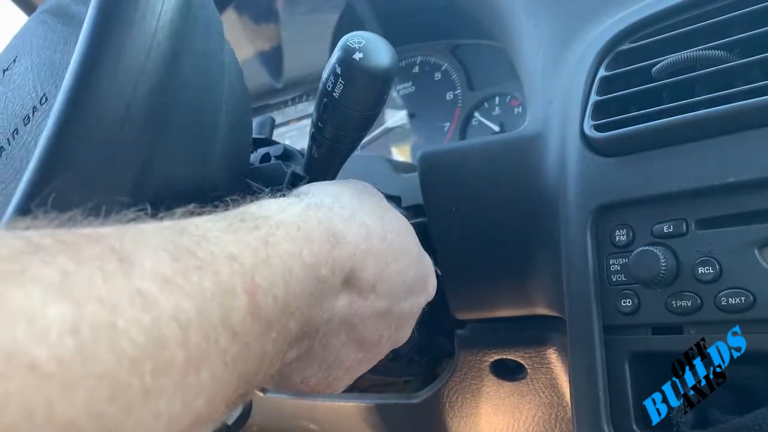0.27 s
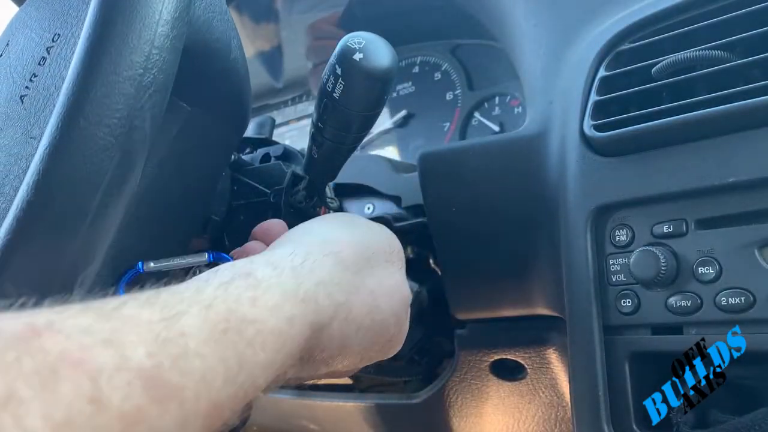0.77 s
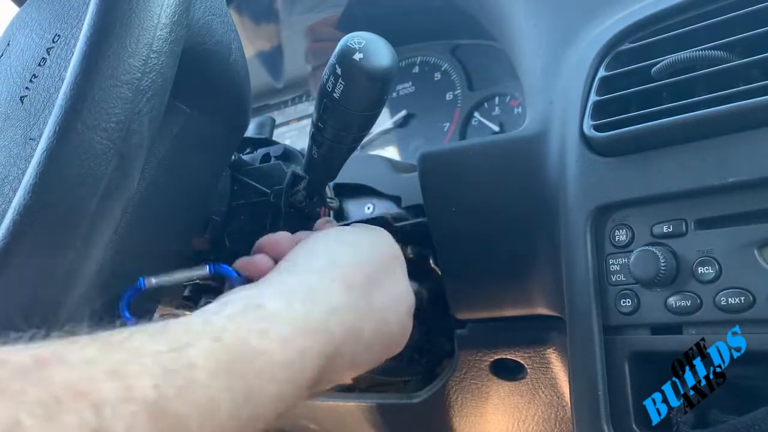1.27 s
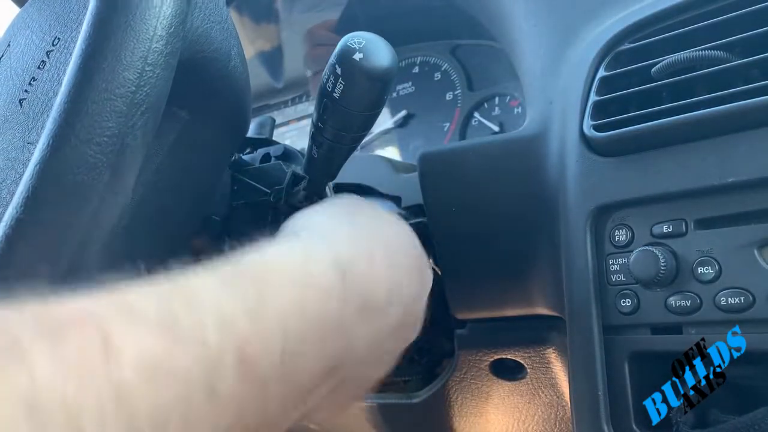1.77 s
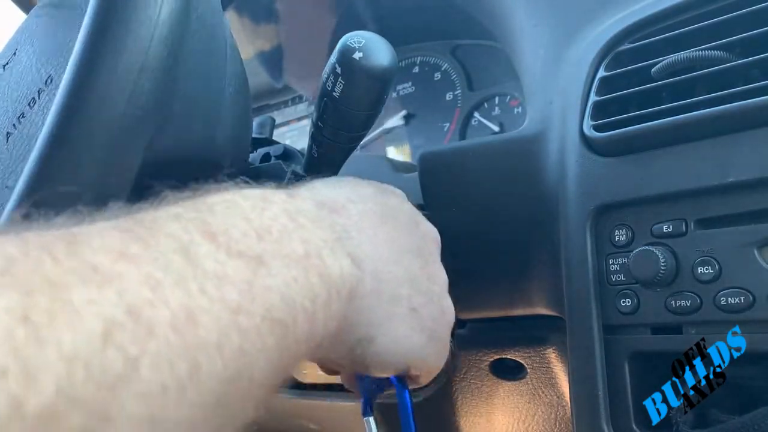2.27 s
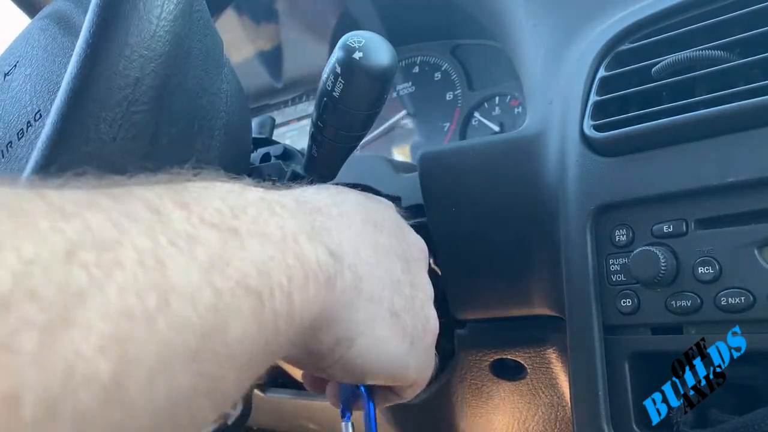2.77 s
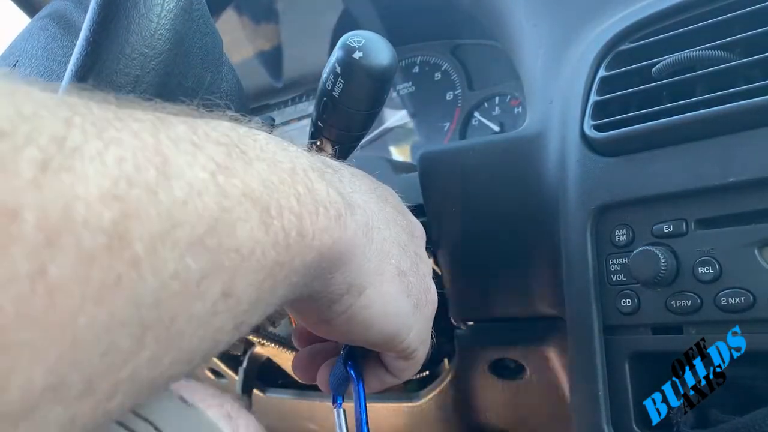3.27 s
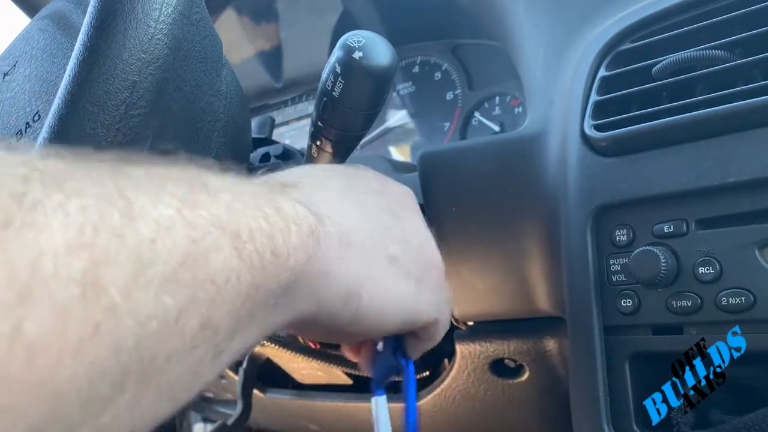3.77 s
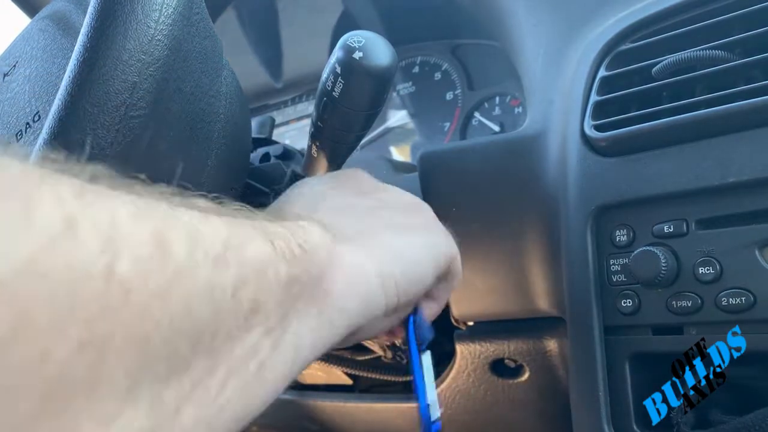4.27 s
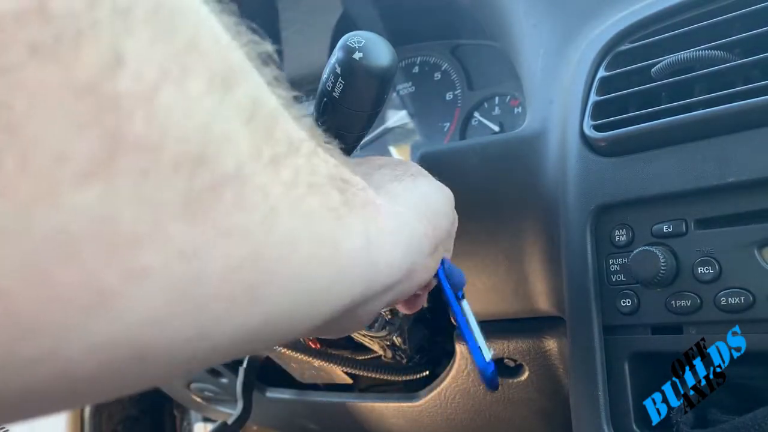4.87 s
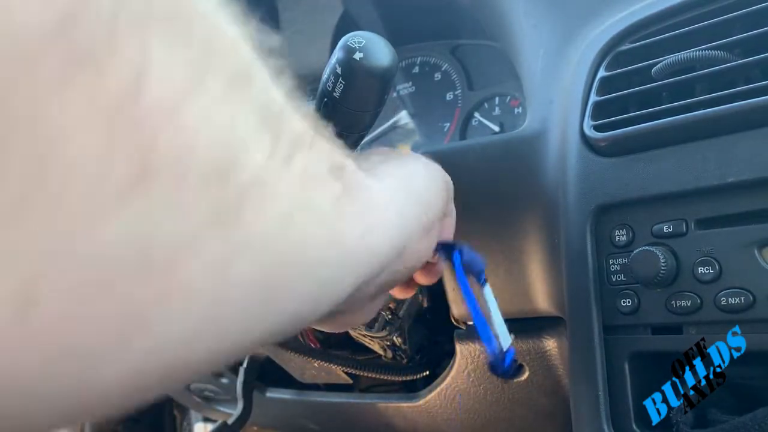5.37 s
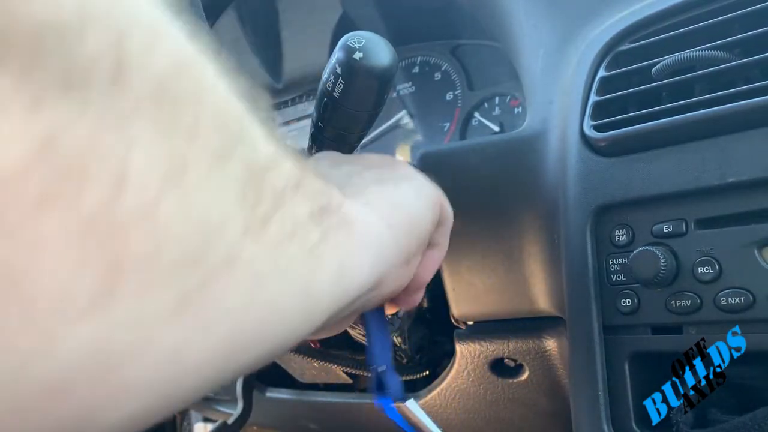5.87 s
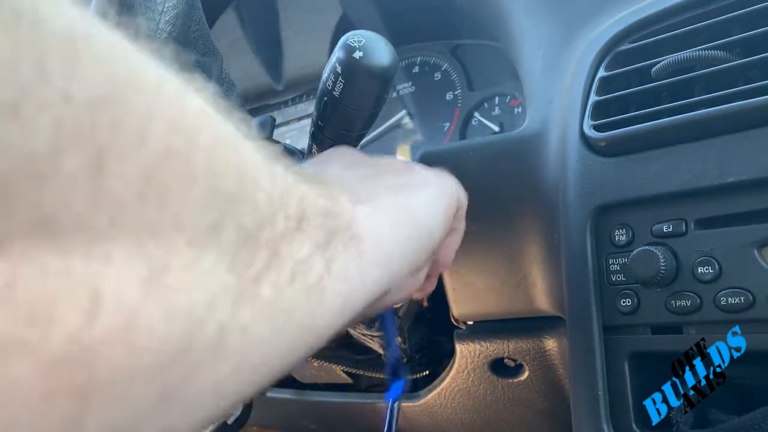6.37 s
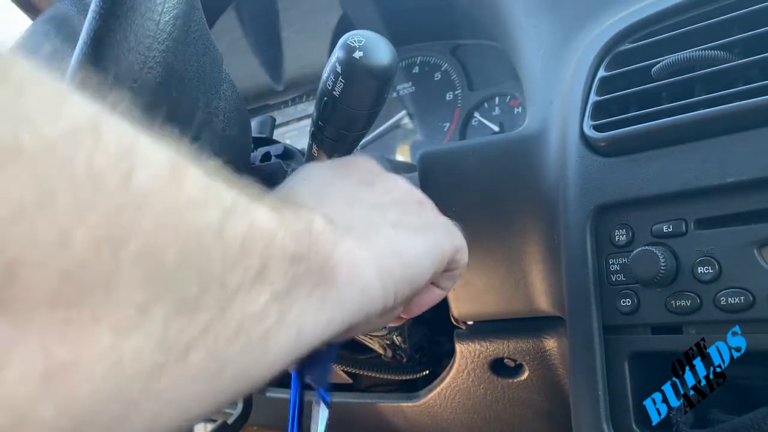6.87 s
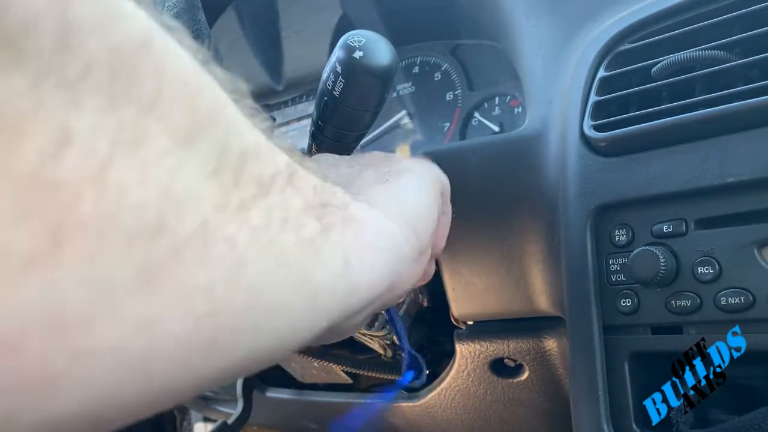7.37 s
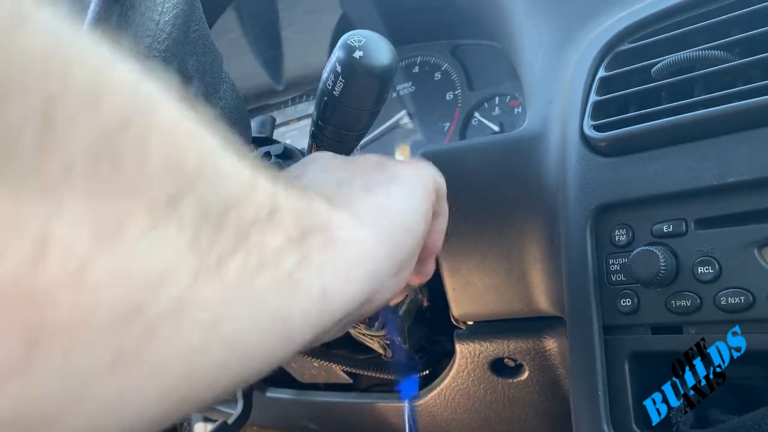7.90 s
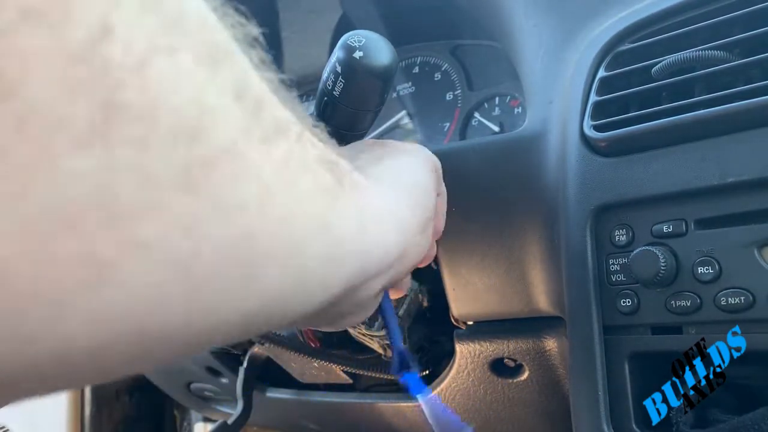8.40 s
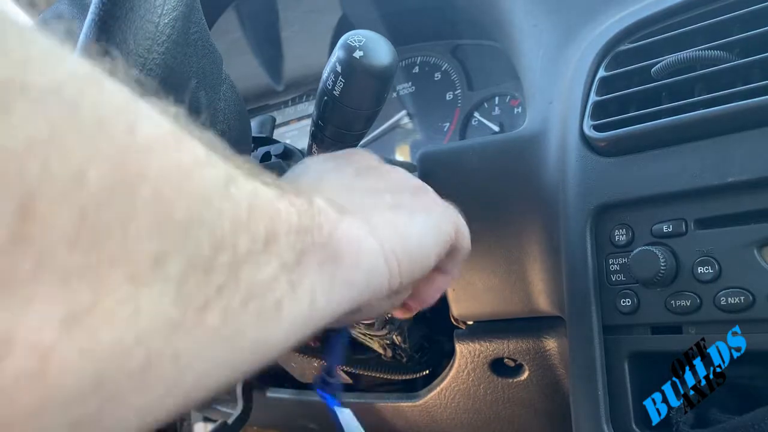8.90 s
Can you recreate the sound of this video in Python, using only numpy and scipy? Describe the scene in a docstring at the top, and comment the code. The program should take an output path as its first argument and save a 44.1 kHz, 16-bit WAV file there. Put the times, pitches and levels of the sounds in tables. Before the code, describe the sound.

Inside a parked car, very close in stereo, a key is worked in a worn ignition lock. Quiet low rumble and faint ticks come first, then a cluster of sharp clicks, a pause with cloth rubbing, a heavy hollow clunk on plastic trim and several deep thumps. A metal clip rings briefly as it bounces, then brisk clicks and small key jingles continue to the end, driest and brightest near the last second.

```python
"""A key is jiggled and turned in a worn ignition lock inside a parked car, heard close by in two channels.
Pins and key tick against the barrel, the housing clacks and the steering column knocks: bursts of shaped noise.
A snap hook rings as it is struck and bounces, the key ring pings and the trim clunks: sums of decaying sines.
Low thumps and higher housing raps are pairs of sines; cloth rustles in filtered noise as the driver shifts,
over the low rumble of the closed cabin, a noise whose boom swells and is stirred by the thumps."""
import sys
import numpy as np
from scipy import signal
from scipy.fft import rfft, irfft, next_fast_len
from scipy.io import wavfile
from scipy.ndimage import uniform_filter1d

SR = 44100
rng = np.random.default_rng(int(sys.argv[2]) if len(sys.argv) > 2 else 0)


def int16_out(signal):
    """Quantize to a 16-bit WAV file."""
    q = np.round(np.clip(np.atleast_2d(signal).T, -1, 1) * 32767)
    wavfile.write(sys.argv[1], SR, q.astype(np.int16))


N = 403074
SLIDE_START_S = 0.03  # lead-in of a burst before the key lands

# Key against the barrel. Each row: landing in seconds, tick level in dB,
# clack of the housing and knock of the column in dB over the tick.
KEY_CLICKS = [(0.6097, -54.5, 4.5, 3), (0.672, -58.5, 13.5, 7), (0.988, -57.5, 12.5, -14),
              (1.019, -36, -6.5, -3.5), (1.176, -61, 6.5, -8), (1.2345, -38.5, 1.5, -5.5),
              (1.387, -55.5, 6, -25), (1.4032, -40.5, 0, -19), (1.417, -39.5, -5.5, -3),
              (1.5908, -48.5, 2.5, -3), (1.6099, -36.5, -14, -8), (1.6214, -36.5, -2.5, -7.5),
              (1.792, -44, 3.5, 1), (1.8306, -35, -7, -13), (2.321, -49, -24, -10), (2.4531, -49, 0, 10),
              (2.4968, -52.5, 4.5, 7.5), (2.707, -51, -0.5, 4.5), (2.9718, -31.5, -3, -22),
              (3.0042, -45.5, -19, 9), (3.586, -57.5, 17, 21), (3.794, -56.5, 12.5, 26.5),
              (3.8626, -48.5, -5, 1.5), (4.0116, -55.5, 3, 8), (4.1307, -50, 11, -13),
              (4.1343, -41, 7.5, 7.5), (4.2105, -33, -13.5, -10), (4.439, -43, 4, -5.5),
              (4.6159, -38, -2, 0.5), (4.6323, -27.5, -4, -12.5), (4.8421, -39.5, -6.5, -11),
              (5.113, -50, 9, 15), (5.1627, -49.5, -26, -1), (5.422, -33.5, -8, -12),
              (5.6121, -46.5, -11, -3), (5.6337, -30.5, -3.5, -6), (5.8386, -40.5, 0.5, -2.5),
              (5.8686, -46, -7, -7), (5.9266, -39.5, -3.5, -5.5), (6.0444, -36, -5, -14),
              (6.088, -35, -2, -30), (6.1199, -52, 6, 4), (6.222, -50.5, 1.5, 3), (6.294, -43.5, -8.5, -4),
              (6.3566, -36.5, 1.5, -4.5), (6.441, -36, -4.5, -12), (6.5065, -33, -4.5, -10),
              (6.59, -34, -6, -12), (6.6542, -35.5, -5, -5.5), (6.7286, -43, -7.5, -12),
              (6.7983, -50, 2, 1.5), (7.015, -49.5, 7.5, -5), (7.0543, -39, -3.5, -29),
              (7.2204, -41, -9, -2), (7.2335, -43, 5, 1.5), (7.41, -39.5, -6, -21),
              (7.434, -38.5, -3.5, -4), (7.607, -40.5, -4.5, -19), (7.7443, -33.5, -3.5, -15),
              (7.8487, -46.5, 0.5, -8), (7.887, -35, -2, -6.5), (7.9711, -43.5, 1, -6),
              (8.199, -48.5, -3, -27), (8.2223, -34.5, -3, -4.5), (8.4303, -39, -2, -6.5),
              (8.5992, -45.5, 7, 0.5), (8.673, -36.5, -5, -6), (8.732, -47.5, 4, 1),
              (8.7948, -26, -14, -11.5), (8.872, -38.5, -8, -7), (8.9339, -43.5, -16, -12.5)]
# Low thumps and higher housing raps. Each row: start in seconds, level in dB,
# pitch in Hz, t60 in seconds (floored where it sounds).
THUMPS_AND_RAPS = [(2.447, -11.5, 254, 0.025), (2.941, -8, 160, 0.059), (3.011, -4, 140.5, 0.056),
                   (3.208, -21.5, 82, 0.11), (3.586, -4.5, 79, 0.014), (3.635, -12, 72, 0.21),
                   (3.639, -31, 1274, 0.055), (3.858, -43, 1144, 0.14), (3.798, -28, 340, 0.045),
                   (4.133, -5, 204, 0.019), (4.633, -23, 103, 0.14), (1.238, -28.5, 1554, 0.031),
                   (4.137, -27, 1180, 0.034), (5.113, -26.5, 1265, 0.032), (5.638, -24, 95, 0.18)]
# Strokes of cloth, hand or key. Each row: start in seconds, length in seconds, dull rub, treble hiss
# (both relative dB), tilt of the hiss in dB per octave, rattle of loose keys in relative dB.
RUB_STROKES = [(-.12, 0.347, -76, -63, -3, -91), (0.528, 0.15, -55, -71, -7, -69),
               (0.983, 0.017, -37, -51.5, -5, -75), (1.165, 0.1, -38, -74, 4, -76),
               (2.211, 0.37, -35, -63.5, 6, -79), (2.578, 0.48, -35, -67, 1, -94),
               (2.916, 0.3, -34, -61.5, 10, -70), (3.195, 0.18, -30, -67, 11, -81),
               (3.564, 0.086, -24.5, -53.5, 6.5, -70), (3.582, 0.22, -49, -54, 14, -85),
               (3.626, 0.24, -50, -51.5, -10.5, -85), (3.84, 0.2, -38.5, -66.5, 0, -92),
               (4.179, 0.33, -38, -64, 3, -80), (4.784, 0.45, -37.5, -65, 2, -71.5),
               (5.22, 0.59, -52, -65, -1.5, -68.5), (5.77, 0.4, -37.5, -66.5, 1, -67.5),
               (6.192, 0.65, -45, -57.5, 2.5, -78), (6.993, 0.1, -36, -69, 11, -90),
               (7.284, 0.24, -49, -67, 4, -64), (7.5, 0.17, -36, -55, 4, -56),
               (7.743, 0.26, -36.5, -58, 4.5, -74), (7.928, 0.35, -45, -56.5, 1.5, -72.5),
               (8.508, 0.31, -37, -61, 0, -47.5)]
# Likeness of the two channels. Each row: frequency in Hz, left-right correlation.
CHANNEL_LIKENESS = [(60, 1), (300, 0.87), (800, 0.13), (5000, 0.023), (7000, 1), (15000, 1)]


def gain_of(db):
    """Decibels to gain."""
    return 10 ** (np.asarray(db) / 20)


def evened(x):
    """Scales to unit rms."""
    return x / np.sqrt(np.mean(x ** 2) + 1e-20)


def read(points, hz):
    """Interpolates a curve on a log-frequency axis."""
    f, value = np.transpose(points)
    return np.interp(np.log(hz + 1), np.log(f + 1), value)


def add(mix, s, sound):
    """Mixes a sound in at a time in seconds."""
    part = mix[..., round(s * SR):][..., :sound.shape[-1]]
    part += sound[..., :part.shape[-1]]


def channel_pair(left, other, same):
    """Two channels whose correlation is set by sharing one of two independent spectra."""
    return np.array([left, same * left + np.sqrt(1 - same ** 2) * other])


def strokes(t):
    """Gain of every stroke over time: it builds, holds and fades."""
    rise_share, fade_db_per_s = 0.26, 326
    start, length = np.transpose(RUB_STROKES)[:2, :, None]
    shape = np.clip((t - start) / (rise_share * length), 0, 1) ** 2
    return shape * gain_of(-fade_db_per_s * np.maximum(t - start - length, 0))


def noise(level_db, size, patchy_db, flicker_db):
    """Two-channel random short-time spectra; level_db(hz, t) gives the field, with drifting patches."""
    hop = size // 4
    frames, hz = N // hop + 5, np.fft.rfftfreq(size, 1 / SR)
    a, b, c, d, patches = rng.standard_normal((frames, len(hz), 5)).T
    patches = uniform_filter1d(patches, size=2, axis=0)
    patches = evened(uniform_filter1d(patches, size=40, axis=1))  # narrow bands that last
    flicker = evened(uniform_filter1d(rng.standard_normal(frames), 3))
    same = np.clip(read(CHANNEL_LIKENESS, hz), -1, 1)[:, None]
    spectra = channel_pair(a + 1j * b, c + 1j * d, same)
    field_db = level_db(hz[:, None], np.arange(frames) * hop / SR)
    spectra *= gain_of(field_db + patchy_db * patches + flicker_db * flicker)
    return signal.istft(spectra / np.sqrt(size), nperseg=size, noverlap=size - hop)[1][:, :N]


def rumble():
    """The cabin's low boom swells slowly and after each thump; the hiss above follows it little."""
    # Each row: frequency in Hz, spectral density in relative dB.
    cabin_colour = [(30, -42), (56, -1.5), (80, 1.5), (117, -10.5), (174, -14.5), (195, -22.5),
                    (1050, -29.5), (1350, -31), (1900, -43.5), (5520, -46.5), (16500, -60.5)]
    # Boom over its quiet colour. Each row: time in seconds, level in relative dB.
    boom_swell = [(0.0, 8.5), (0.49, 4.5), (1.47, 10.5), (1.96, 5.5), (3.46, 3.5), (4.2, 8), (6.04, 3.5),
                  (6.52, 9), (6.95, 4.5), (8.82, 8), (9.14, 3)]
    cabin_db, stir_db, stir_t60_s, stir_delay_s = -20, 38, 0.34, 0.03

    def level_db(hz, t):
        stirred = 0
        for s, db, pitch_hz, _ in THUMPS_AND_RAPS:
            settling = gain_of(db + stir_db - 60 * abs(t - s) / stir_t60_s)
            stirred = stirred + settling * (t > s + stir_delay_s) * min(1, 90 / pitch_hz) ** 2
        boom_db = 20 * np.log10(gain_of(np.interp(t, *np.transpose(boom_swell))) + stirred)
        return read(cabin_colour, hz) + cabin_db + boom_db / (1 + (hz / 220) ** 2)
    return noise(level_db, size=2048, patchy_db=2.5, flicker_db=2.5)


def rustle():
    """A dull rub and a bright hiss of cloth, hand and key, both flickering."""
    # Each row: frequency in Hz, spectral density in relative dB.
    dull_colour = [(150, 10.5), (300, 1), (700, -3.5), (1700, -12.5), (3000, -27), (5000, -45)]
    # Each row: frequency in Hz, spectral density in relative dB.
    hiss_colour = [(1500, -3), (2500, 9), (4000, 9), (6000, 2), (9000, -7), (13000, -13), (15500, -28.5),
                   (16500, -38)]
    _, _, dull_db, hiss_db, tilt_db, _ = np.transpose(RUB_STROKES)

    def level_db(hz, t):
        dull = read(dull_colour, hz) + dull_db
        hiss = read(hiss_colour, hz) + hiss_db + tilt_db * np.log2((hz + 500) / 4500)  # pivot 4 kHz
        power = (gain_of(dull) + gain_of(hiss)) ** 2 @ strokes(t) ** 2
        return 10 * np.log10(power + 1e-18)
    return noise(level_db, size=384, patchy_db=4, flicker_db=1.5)


def thumps_and_raps():
    """A push rings a body part, low for thumps, near 1.2 kHz and up for housing raps, and a weaker sine a fifth above."""
    out, t = np.zeros(N), np.arange(20000) / SR
    shortest_t60_s = 0.02
    for s, db, hz, t60 in THUMPS_AND_RAPS:
        main = gain_of(-60 * t / max(t60, shortest_t60_s)) * np.sin(2 * np.pi * hz * t)
        fifth_decay = gain_of(-5.5 - 60 * t / max(0.63 * t60, shortest_t60_s))
        fifth = fifth_decay * np.sin(2 * np.pi * 1.5 * hz * t)
        push = 1 - np.exp(-t / min(0.01, 2.3 / hz))
        add(out, s, gain_of(db) * (main + fifth) * push)
    return out


def chimed(blows, modes):
    """Every blow rings the same modes in new shares, softer ones duller; neighbours start in opposition."""
    out, t = np.zeros(N), np.arange(12000) / SR
    soft_dull = 1.2  # dB lost per octave above 3600 Hz, per dB below the hardest blow
    hardest_db = max(db for _, db in blows)
    shares = rng.uniform(0.75, 1.2, (len(blows), len(modes)))
    for (s, db), share in zip(blows, shares):
        ringing = np.zeros(len(t))
        for i, (hz, mode_db, t60) in enumerate(modes):
            dull_db = soft_dull * (db - hardest_db) * max(np.log2(hz / 3600), 0)
            level = share[i] * (-1) ** i * gain_of(dull_db)
            onset = 1 - np.exp(-1.5 * hz * t)
            ringing += level * gain_of(mode_db - 60 * t / t60) * np.sin(2 * np.pi * hz * t) * onset
        add(out, s, gain_of(db) * ringing)
    return out


def trim():
    """A hard blow lands in two steps on the hollow trim and rings its damped modes."""
    # Each row: time in seconds, level in dB.
    clunk_blows = [(2.9662, -13), (2.9694, -8)]
    # Each row: frequency in Hz, level in relative dB, t60 in seconds.
    trim_modes = [(90, -36, 0.61), (156, 10, 0.05), (223, -0.5, 0.072), (391.5, -9.5, 0.1),
                  (550, -19, 0.14), (713, -17, 0.089), (892, -18.5, 0.043), (1200, -3.5, 0.0077)]
    return chimed(clunk_blows, trim_modes)


def key_ring():
    """The key ring pings in a single mode."""
    # Each row: time in seconds, level in dB.
    ring_blows = [(4.1365, -33)]
    # Each row: frequency in Hz, level in relative dB, t60 in seconds.
    ring_modes = [(2765, 0, 0.09)]
    return chimed(ring_blows, ring_modes)


def snap_hook():
    """The snap hook is struck and bounces, ringing its modes at each blow."""
    # Each row: time in seconds, level in dB.
    hook_blows = [(4.1939, -36), (4.209, -20), (4.248, -29), (4.2721, -29), (4.3036, -38)]
    # Each row: frequency in Hz, level in relative dB, t60 in seconds.
    hook_modes = [(1206, -26, .2), (1968, -20, .12), (2730, -17, .04), (3460, -11, .06), (3522, -9, .16),
                  (3805, -4, .045), (6295, -12, .025)]
    return chimed(hook_blows, hook_modes)


def struck(colour, slide_s, slide_db, rise_s, t60, lumpy_db, chatter_db):
    """One burst a click: many close, damped modes act as dying noise, with other peaks for every grip.
    The key slides briefly around its landing while loose parts chatter; each channel has another mix of modes."""
    size, treble_same = 4096, 0.75  # treble_same caps the channels' likeness above 1 kHz
    t, hz = np.arange(size) / SR - SLIDE_START_S, np.fft.rfftfreq(size, 1 / SR)
    draws = rng.standard_normal((len(KEY_CLICKS), 4, size))
    left, other, lumps, chatter = draws.transpose(1, 0, 2)
    fortieth_octaves = (40 * np.log2(hz + 50)).astype(int)
    lumps = evened(uniform_filter1d(lumps, 7))[:, fortieth_octaves]
    same = np.clip(read(CHANNEL_LIKENESS, hz), -1, np.where(hz > 1000, treble_same, 1))
    spectra = channel_pair(rfft(left), rfft(other), same)
    y = irfft(spectra * gain_of(read(colour, hz) + lumpy_db * lumps))
    after = np.maximum(t, 0)
    blow = (1 - np.exp(-after / rise_s)) * gain_of(-60 * after / t60)
    chatter = uniform_filter1d(uniform_filter1d(chatter, size=50), size=50)
    loose = gain_of(chatter_db * evened(chatter))
    slide = gain_of(slide_db) * np.exp(-np.maximum(t, -2.2 * t) / slide_s)
    y = y * (blow + slide * loose)
    peak = np.sqrt(uniform_filter1d(y[0] ** 2, 130).max(1, keepdims=True))  # of the left envelope
    return (y / peak).transpose(1, 0, 2)


def loose_keys(barrel_colour, clacks):
    """Light ticks of changing pitch, some placed, many small ones at random while the hand moves."""
    # Each row: landing in seconds, peak level in dB, favoured pitch in Hz.
    placed_ticks = [(0.3067, -48.5, 4900), (0.363, -47, 7040), (1.0046, -36, 7300), (1.2113, -29.5, 7250),
                    (1.244, -38, 9770), (1.666, -37, 4260), (2.868, -46, 3530), (3.5733, -44, 3040),
                    (4.2476, -42, 5000), (4.271, -33.5, 3870), (4.4197, -44, 12000), (4.4725, -40, 6900),
                    (5.1956, -48, 6210), (5.3776, -41.5, 2730), (5.4004, -39, 3060), (6.0313, -32, 7700),
                    (6.0997, -38, 7440), (6.142, -30.5, 7850), (6.347, -45, 7400), (6.5723, -32, 6900),
                    (6.7208, -31, 6840), (7.0344, -40, 7000), (7.357, -44.5, 10600), (7.3774, -41, 10500),
                    (7.639, -36, 10100), (7.86, -55, 12000), (8.211, -28, 6950), (8.3641, -39.5, 11500),
                    (8.381, -36.5, 10100), (8.4, -37, 9900), (8.639, -35, 6000), (8.652, -30, 8000),
                    (8.784, -19, 10200), (8.86, -42, 9750)]
    lowest_hz, highest_hz, fall_db_per_octave = 2880, 12000, 7
    clack_db, rattle_count, spread_db = -1, 400, 3.5
    out = np.zeros((2, N))
    light = struck(barrel_colour, slide_s=0.004, slide_db=-20, rise_s=0.0003, t60=0.015,
                   lumpy_db=4.5, chatter_db=7)
    pitch = np.geomspace(lowest_hz, highest_hz, len(light))[rng.permutation(len(light))]
    pitch[:len(placed_ticks)] = np.transpose(placed_ticks)[2]
    hz = np.fft.rfftfreq(4096, 1 / SR)
    octaves_off = abs(np.log2((hz + 1) / pitch[:, None, None]))
    light = irfft(rfft(light + gain_of(clack_db) * clacks) * gain_of(-fall_db_per_octave * octaves_off))
    light /= abs(light).max((1, 2), keepdims=True)
    for (s, db, _), tick in zip(placed_ticks, light):
        add(out, s - SLIDE_START_S, gain_of(db) * tick)
    when, luck, which = rng.random((rattle_count, 3)).T
    when_s = when * N / SR
    hand = gain_of(np.transpose(RUB_STROKES)[-1]) @ strokes(when_s)
    sizes = hand * gain_of(-spread_db * np.log(np.maximum(luck, 0.05)))
    for s, size, k in zip(when_s, sizes, (which * len(light)).astype(int)):
        add(out, s, 2 * size * light[k])
    return out


def key():
    """Each click sounds in barrel, housing and column; the heavier parts rise and die more slowly."""
    # Each row: frequency in Hz, spectral density in relative dB.
    barrel_colour = [(1760, -10.5), (3000, -4.5), (5460, -4), (7530, -3), (10100, -3.5), (13200, -10.5),
                     (15300, -12.5), (16500, -85)]
    # Each row: frequency in Hz, spectral density in relative dB.
    housing_colour = [(200, -43), (440, -32), (750, -17.5), (1100, -22.5), (1450, -15), (1630, -19.5),
                      (3200, -28.5), (7040, -120)]
    # Each row: frequency in Hz, spectral density in relative dB.
    column_colour = [(100, -13), (180, 3), (295, 9.5), (420, 5.5), (750, -10.5), (980, -16.5), (1650, -120)]
    out = np.zeros((2, N))
    ticks = struck(barrel_colour, slide_s=0.013, slide_db=-20.0, rise_s=0.00047, t60=0.014,
                   lumpy_db=2.0, chatter_db=8.0)
    clacks = struck(housing_colour, slide_s=0.015, slide_db=-14.5, rise_s=0.0007, t60=0.099,
                    lumpy_db=4.0, chatter_db=6.5)
    knocks = struck(column_colour, slide_s=0.022, slide_db=-27.5, rise_s=0.019, t60=0.12,
                    lumpy_db=5.5, chatter_db=-7.0)
    for (s, db, clack_db, knock_db), tick, clack, knock in zip(KEY_CLICKS, ticks, clacks, knocks):
        click = tick + gain_of(clack_db) * clack + gain_of(knock_db) * knock
        add(out, s - SLIDE_START_S, gain_of(db) * click)
    return out + loose_keys(barrel_colour, clacks)


def cabin(x, t60):
    """Sparse reflections of random sign in a small padded space, partly other ones in each channel."""
    size = 8000
    taps, slots = np.zeros((2, size)), np.arange(60, 7980, 20)
    shape = (2, len(slots))
    np.put_along_axis(taps, slots + rng.integers(0, 20, shape), rng.choice([-1., 1.], shape), 1)
    left, other = rfft(taps * gain_of(-60 * np.arange(size) / SR / t60))
    same = np.clip(read(CHANNEL_LIKENESS, np.fft.rfftfreq(size, 1 / SR)), -1, 1)
    taps = irfft(channel_pair(left, other, same))
    return signal.fftconvolve(x[None], taps / np.linalg.norm(taps[0]), axes=1)[:, :N]


def scene():
    """Lock, hook, ring and trim with the cabin's reflections, thumps and raps, cloth and rumble."""
    blows = key() + snap_hook() + key_ring() + trim()
    reflections = gain_of(-5.5) * cabin(blows[0], t60=0.04)
    return blows + reflections + thumps_and_raps() + rustle() + rumble()


def record(dry):
    """The two channels differ in phase and level by frequency; then the band limit."""
    # Each row: frequency in Hz, left over right in dB.
    left_lean = [(60, -3), (180, 2), (550, 1.5), (1650, 2), (4970, -2), (15000, 1)]
    # Left channel's phase lead. Each row: frequency in Hz, lead in turns.
    left_lead = [(1000, .05), (3600, .3), (5400, .5), (6600, 1), (8100, 1), (9000, 2), (13000, 2),
                 (13900, 3)]
    bass_hz, edge_hz = 42, 16600
    size = next_fast_len(N + 64)
    hz = np.fft.rfftfreq(size, 1 / SR)
    bass_cut = (hz / bass_hz) ** 2 / np.sqrt(1 + (hz / bass_hz) ** 4)  # tiny capsules lose the deepest bass
    half = gain_of(read(left_lean, hz) / 2) * np.exp(1j * np.pi * read(left_lead, hz))
    channels = irfft(rfft(dry, size) * bass_cut * np.array([half, 1 / half]), size)[:, :N]
    low_pass = signal.firwin(511, edge_hz, window=("kaiser", 9), fs=SR)
    return signal.oaconvolve(channels, low_pass[None], "same")


dry = scene()
out = record(dry)
int16_out(out)
```